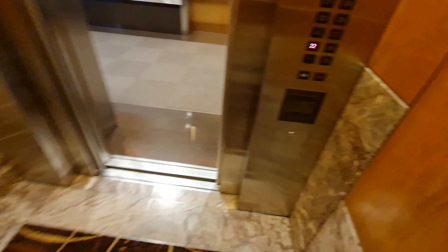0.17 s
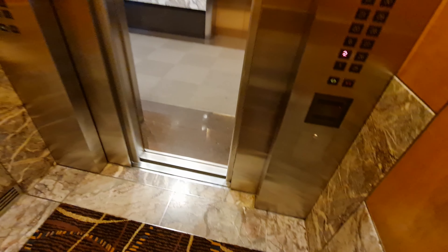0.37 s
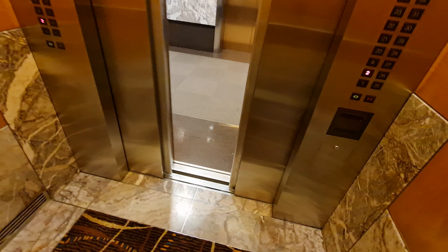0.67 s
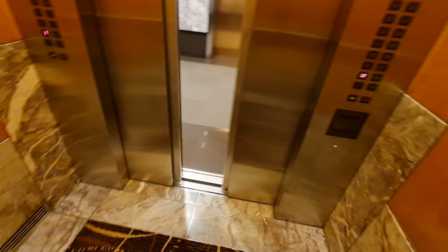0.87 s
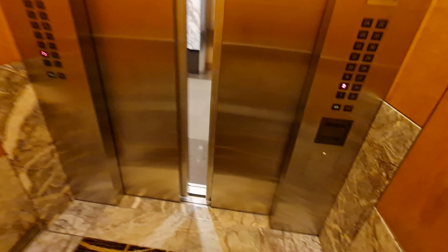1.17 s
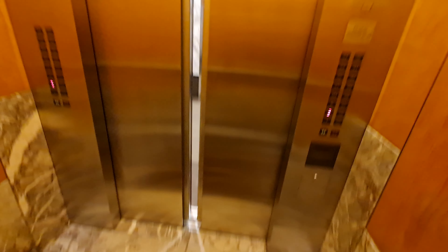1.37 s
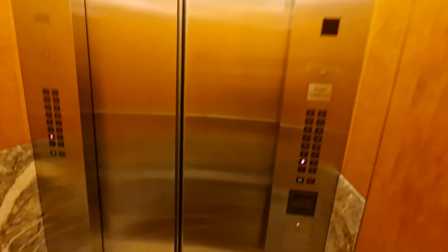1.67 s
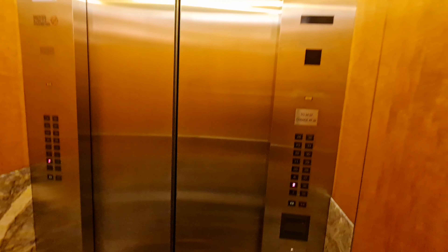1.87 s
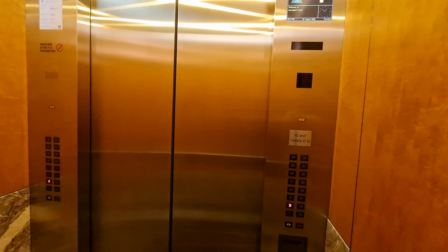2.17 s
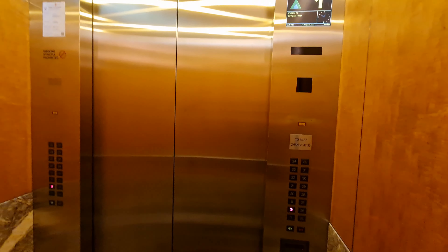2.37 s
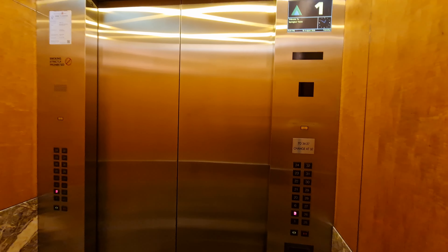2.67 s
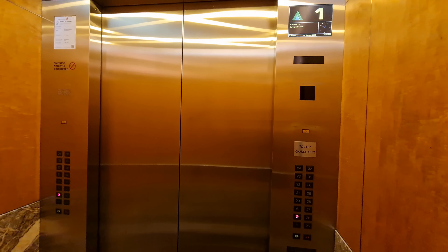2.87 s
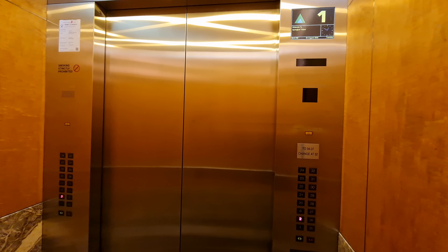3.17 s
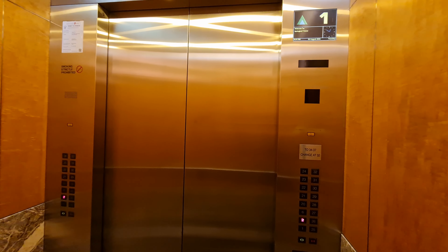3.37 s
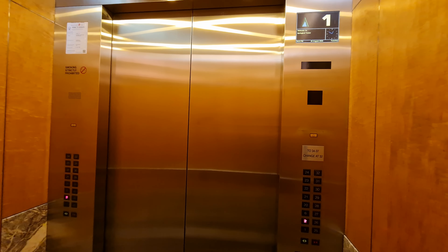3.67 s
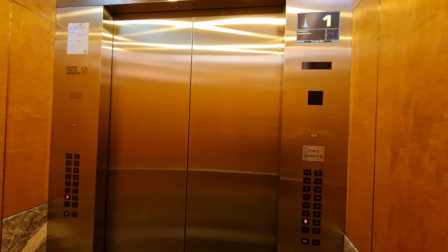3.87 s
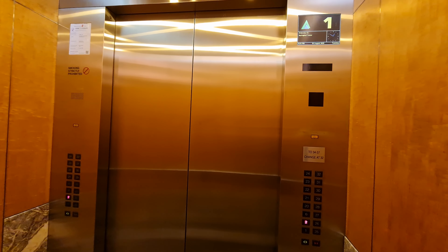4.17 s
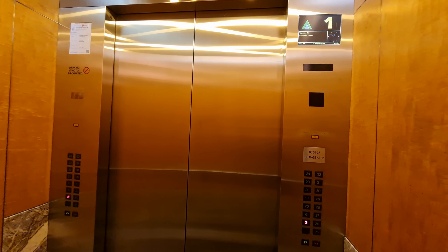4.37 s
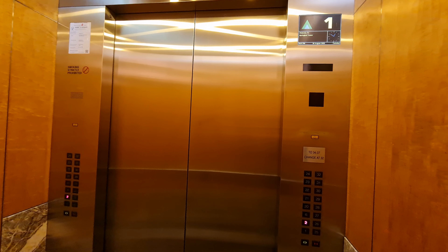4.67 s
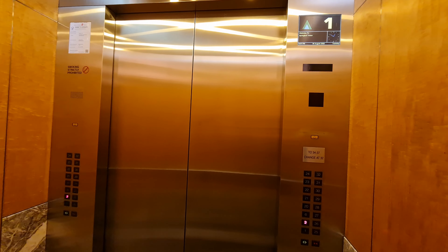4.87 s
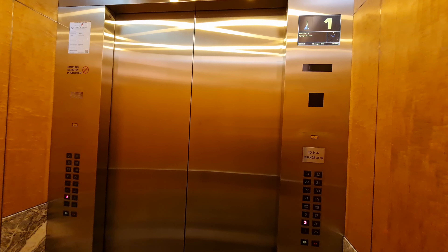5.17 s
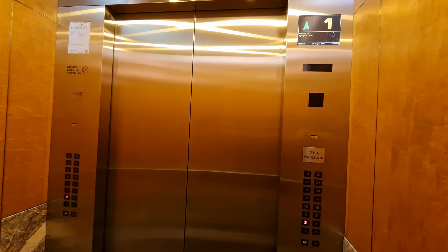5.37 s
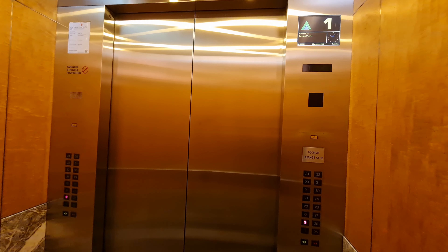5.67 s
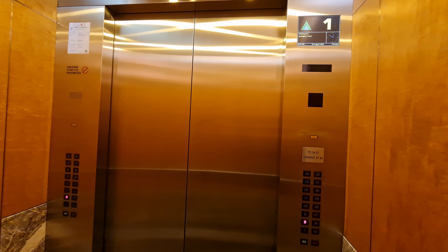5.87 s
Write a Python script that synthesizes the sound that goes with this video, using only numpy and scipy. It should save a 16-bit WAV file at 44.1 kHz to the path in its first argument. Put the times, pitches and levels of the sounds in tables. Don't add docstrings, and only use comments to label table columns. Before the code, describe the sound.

A closed lift car hums deeply at close range while rollers sing faintly, cloth rubs, a click snaps, and the floor shudders gently.

```python
import sys
import numpy as np
from scipy import signal
from scipy.fft import rfft, irfft, next_fast_len
from scipy.io import wavfile
from scipy.ndimage import uniform_filter1d, map_coordinates

SR = 44100
rng = np.random.default_rng(int(sys.argv[2]) if len(sys.argv) > 2 else 0)


def int16_out(signal):
    q = np.round(np.clip(np.atleast_2d(signal).T, -1, 1) * 32767)
    wavfile.write(sys.argv[1], SR, q.astype(np.int16))


def nominal_scale(level):
    x = np.asarray(level, float) / 20
    return 10 ** x


N = 264952


def unit(x):
    return x / np.sqrt(np.mean(x ** 2) + 1e-20)


def along(points, hz):
    point_hz, value = np.transpose(points)
    return np.interp(np.log(hz + 1), np.log(point_hz + 1), value)


def curves(rows):
    s, *columns = np.transpose(rows)
    return [np.interp(np.arange(N) / SR, s, column) for column in columns]


def wobble(rate, part=slice(None)):
    knots = rng.standard_normal(int(N * 60 / SR) + 4)
    return map_coordinates(knots, [np.arange(N)[part] * min(rate, 60) / SR])


def sides(db):
    return nominal_scale(np.array([db / 2, -db / 2]))


def filtered(x, response):
    size = next_fast_len(N + 8192)
    return irfft(rfft(x, size) * response(np.fft.rfftfreq(size, 1 / SR)), size)[..., :N]


def rush(gain, patchy_db, lean=0):
    # pitch_hz, likeness [-1 to 1]
    coherence = [(60, 0.83), (110, 1), (200, 0.73), (380, 0.13), (700, -0.25), (1290, -0.49),
                 (2380, -0.073), (4400, -0.06), (8120, -0.17), (15000, 0.06)]
    # pitch_hz, level_db
    balance = [(60, -4), (110, -11.5), (200, -3.5), (380, 1), (700, -1), (1290, 0), (2380, 1.5),
               (4400, -4.5), (8120, -7.5), (15000, -5)]
    z = signal.stft(rng.standard_normal((2, N + 512)), nperseg=512)[2]
    field = uniform_filter1d(rng.standard_normal(z.shape[1:]), size=6, axis=0)
    field = uniform_filter1d(field, size=12, axis=1)
    pair = signal.istft(z * nominal_scale(patchy_db * unit(field)), nperseg=512)[1][:, :N]

    def mid_side_gain(hz):
        angle = np.arccos(np.clip(along(coherence, hz), -1, 1)) / 2
        return gain(hz) * np.array([np.cos(angle), np.sin(angle)])

    mid, side = filtered(pair, mid_side_gain)
    both = np.array([mid + side, mid - side])
    both = filtered(both, lambda hz: sides(lean * along(balance, hz)))
    return both / np.std(both.mean(axis=0))


def shaped(points):
    return lambda hz: nominal_scale(along(points, hz)) * (hz > points[0][0]) * (hz < points[-1][0] * 1.2)


def peak(centre_hz, width_hz):
    return lambda hz: 1 / np.abs(1 + 2j * (hz - centre_hz) / width_hz)


def swells(times, halves, gains, rise=1):
    late = np.arange(N) / SR - np.asarray(times)[:, None]
    spread = np.where(late < 0, rise, 1) * np.reshape(halves, (-1, 1))
    return np.asarray(gains) ** 2 @ np.exp(-2 * (late / spread) ** 2)


def fan():
    # pitch_hz, level_db [per Hz]
    air_spectrum = [(12, -56.5), (25, -33.5), (72, -29), (100, -28), (140, -27.5), (280, -37.5), (630, -41),
                    (960, -51), (1720, -55), (2000, -60.5), (3660, -68.5), (6040, -71.5), (8700, -92),
                    (9200, -100)]
    # pitch_hz, level_db [per Hz]
    hiss_spectrum = [(5000, -16.5), (8600, -1), (9300, -2.5), (10500, -3.5), (12000, -1.5), (15800, -6.5)]
    # start_s, level_db
    flow = [(0, 1.5), (1.5, 2), (3, 2), (4.5, 0.5), (6.01, 0.5)]
    flow_db, = curves(flow)
    air = nominal_scale(-40.5 + flow_db + 0.19 * wobble(8.7)) * rush(shaped(air_spectrum), patchy_db=0.5, lean=1)
    return air + nominal_scale(-89.0) * rush(shaped(hiss_spectrum), patchy_db=.3, lean=1)


def hum():
    # start_s, level_db, left_right_db
    standing_wave = [(0.0, -24, -2.5), (0.37, -23, -3), (1.0, -27, -6.5), (1.32, -23.5, -6),
                     (1.5, -24.5, -5.0), (1.91, -21, -3), (2.39, -20, -2.5), (3.16, -20, -3.0),
                     (3.8, -22.5, -3.5), (4.05, -21.5, -3.5), (5.76, -22.5, -4.0), (6.01, -22.5, -4.0)]
    pitch_hz, start_rad, left_lead_rad = 100.11, .9, .22
    level_db, pan_db = curves(standing_wave)
    phase = 2 * np.pi * pitch_hz * np.arange(N) / SR + start_rad
    lead = np.array([[.5], [-.5]]) * left_lead_rad
    return np.sqrt(2) * nominal_scale(level_db) * sides(pan_db) * np.cos(phase + lead)


def hoist():
    # pitch_hz, level_db
    whine = [(5852, -91), (5954, -85.5), (6051, -83.5), (6153, -89), (6352, -98.5), (6455, -94.5)]
    # pitch_hz, width_hz, level_db
    modes = [(200, 17, -56), (211.5, 6.1, -54), (433, 9.3, -52), (545, 5.4, -59.5), (700, 9.7, -65.5),
             (1734, 150, -61.5)]
    # start_s, panel_drive_db, whine_db
    drive = [(0, -4, -8), (1.5, 0.5, -10), (2.5, 1.5, 0.5), (3.3, 0.5, -4.5), (3.8, 0, -1), (4.4, 4, 3.5),
             (5, 2, -9), (6.01, 4, -2.5)]
    drive_db, whine_db = curves(drive)

    def body(hz):
        return np.sqrt(sum((nominal_scale(db) * peak(c, w)(hz)) ** 2 / w for c, w, db in modes))

    panels = nominal_scale(drive_db - 54.5) * rush(body, patchy_db=.3, lean=1)
    t = np.arange(N) / SR
    comb = 0
    for hz, db in whine:
        comb = comb + nominal_scale(db + 3 * wobble(3)) * np.sin(2 * np.pi * (hz * t + rng.random()))
    return panels + nominal_scale(whine_db + 1.5) * comb * sides(-13.5)[:, None]


def singing():
    # centre_s, half_length_s, pitch_hz, level_db
    tones = [(0.34, 0.085, 290, -46.5), (.45, 0.064, 330, -52), (0.718, 0.084, 430, -43.5),
             (.95, 0.21, 235, -45.5), (0.5, 0.16, 525, -48), (1.56, 0.14, 310, -45.5),
             (2.0, 0.3, 630, -56.5), (1.2, 0.2, 230, -56), (4.4, 0.6, 335, -50.5), (4.28, 0.12, 801, -56.5),
             (4.58, 0.1, 801, -51.5), (5.18, 0.17, 801, -52.5), (4.45, 0.097, 640, -47.5),
             (4.75, 0.16, 640, -55.5), (4.2, 0.2, 640, -55), (7.7, 0.17, 840, -61.5),
             (6.1, 0.16, 440, -60.5), (4.5, .3, 425, -57.5)]
    out = np.zeros((2, N))
    right_lag_rad = np.array([[0], [1.3]])
    for s, half, hz, db in tones:
        part = slice(max(round((s - 2 * half) * SR), 0), round((s + 2 * half) * SR))
        t = np.arange(N)[part] / SR
        swell = nominal_scale(db + 2 + 2.6 * wobble(12, part)) * np.exp(-((t - s) / half) ** 4)
        out[:, part] += swell * np.sin(2 * np.pi * hz * t + 1.6 * wobble(14, part) - right_lag_rad)
    return out


def squeaks():
    # centre_s, half_length_s, pitch_hz, width_hz, level_db
    rubs = [
        (1.0, 0.15, 2900, 300, -57),
        (1.393, 0.031, 1100, 300, -49.5),
        (1.657, .05, 1820, 110, -60),
        (2.199, 0.042, 1400, 800, -58),
        (2.583, 0.014, 700, 500, -49.5),
        (4.15, 0.049, 2500, 500, -61.5),
        (4.57, 0.033, 8100, 150, -90),
        (5.46, .06, 9700, 251, -78.5),
        (5.79, .03, 8150, 150, -88),
    ]
    n = SR // 2
    out = np.zeros((2, N + SR))
    t, hz = (np.arange(n) - n // 2) / SR, np.fft.rfftfreq(n, 1 / SR)
    for s, half, c, w, db in rubs:
        noise = rng.standard_normal((2, n))
        rub = unit(irfft(rfft(noise) * peak(c, w)(hz) ** 2, n))
        out[:, round(s * SR) - n // 2:][:, :n] += nominal_scale(db) * np.exp(-(t / half) ** 4) * rub
    return out[:, :N]


def cloth():
    # pitch_hz, level_db [per Hz]
    scuff_spectrum = [(600, -29.5), (1000, -1), (1700, -0.5), (2900, -2), (4500, -22)]
    swish_spectrum = [(2200, -21.5), (3500, -1), (6000, -2.5), (8700, -12.5), (9200, -28)]
    fizz_spectrum = [(6000, -22), (8700, 0.5), (9500, -1), (12000, -1.5), (15800, -7.5)]
    # start_s, level_db
    fidget = [(0, 1.5), (.8, 0), (.97, 0), (1.5, -1), (1.75, -5), (2.2, -3), (2.75, -10.5), (4.4, -12.5),
              (4.6, -17), (6.01, -18)]
    # level_db [full movement], growth [dB per dB of movement], flutter_db
    weave = [
        (-58.5, 1.12, 1.75),
        (-60.5, 0.94, 0.77),
        (-72.5, 2.1, -0.1),
    ]
    # start_s, coarse_left_right_db, fine_left_right_db
    facing = [(0, -3.5, -4), (.78, -2, -5.5), (.89, 1, -1.5), (1.0, 1.5, -5.5), (2.1, -1, -8),
              (6.01, -3, -5)]
    # centre_s, length_s, swish_db, scuff_over_swish_db, fizz_over_swish_db
    stroke_rows = [(.06, 0.05, -57, 3, -7), (0.54, 0.14, -64.5, -4, -1.5), (0.693, .06, -68, -7, -0.5),
                   (0.868, 0.071, -58.5, 2, -12), (1.024, 0.037, -60, -3, -18.5),
                   (1.24, .07, -57.5, 4.5, -12), (1.386, .08, -58.5, 3.5, -19.5),
                   (1.955, 0.11, -66, -7, -13.5), (2.059, .04, -62, 3, -15), (2.17, .06, -59, 7, -16),
                   (2.373, .05, -66.5, 7.5, -21), (2.466, .06, -60.5, -7, -18.5),
                   (3.205, .15, -73.5, 3, -14.5), (3.381, 0.093, -69, 4.5, -20.5)]
    move_db, = curves(fidget)
    low_db, high_db = curves(facing)
    s, length, db, coarse_db, fine_db = np.transpose(stroke_rows)
    strokes = swells(s, length, nominal_scale([db + coarse_db, db, db + fine_db]), rise=.4)
    flutter = wobble(40)
    gains = []
    for (full_db, growth, depth_db), extra in zip(weave, strokes):
        bed = nominal_scale(full_db + growth * move_db)
        gains.append(np.sqrt(bed ** 2 + extra) * nominal_scale(depth_db * flutter))
    scuff = gains[0] * rush(shaped(scuff_spectrum), patchy_db=2.0)
    swish = gains[1] * rush(shaped(swish_spectrum), patchy_db=0.8)
    fizz = gains[2] * rush(shaped(fizz_spectrum), patchy_db=.3)
    return scuff * sides(low_db) + swish * sides(.5 * (low_db + high_db) - 1.5) + fizz * sides(high_db)


def grip():
    # start_s, peak_db, pitch_hz
    creaks = [(1.0288, -46, 13500), (1.0293, -46, 8000), (1.0375, -44, 13000), (1.0378, -41, 5000),
              (1.0455, -44, 6500), (1.0483, -49, 13000), (1.0913, -38, 13500), (1.387, -49, 13000),
              (1.4246, -37, 6500), (1.425, -37, 7000), (1.4248, -41, 12500), (1.7694, -46, 3500)]
    # start_s, peak_db
    snap_s, snap_db = (1.09118, -13.5)
    # pitch_hz, level_db, t60_s
    casing = [(560, -4, 0.0064), (1530, -11, 0.0047), (3180, -12, .002)]
    out, t = np.zeros(N), np.arange(-40, 400) / SR
    after = np.maximum(t, 0)
    rebound = sum(nominal_scale(db - 60 * after / t60) * np.sin(2 * np.pi * hz * after) for hz, db, t60 in casing)
    push = np.exp(-np.abs(t / 7e-5) ** 1.4)
    out[round(snap_s * SR) - 40:][:len(t)] += nominal_scale(snap_db) * (push - rebound)
    for s, db, hz in creaks:
        creak = np.exp(-(t / 1.6e-4) ** 2) * np.cos(2 * np.pi * hz * t)
        out[round(s * SR) - 40:][:len(t)] += nominal_scale(db) * creak
    return np.array([-nominal_scale(-16.0) * np.roll(out, 3), out])


def doors():
    # start_s, level_db
    speed = [
        (0, 0),
        (.6, 0),
        (1.2, -3.5),
        (1.5, -2),
        (1.9, -4.5),
        (2.6, -6.5),
        (4.6, -7),
        (5, -2.5),
        (6.01, -4.5),
    ]
    # pitch_hz, level_db [per Hz]
    roll_spectrum = [(150, -29.5), (250, 0.5), (420, 1.5), (700, -6), (1200, -16), (2500, -28)]
    shake_spectrum = [(12, -27.5), (25, -1.5), (55, -1), (80, -5.5), (160, -28.5)]
    # centre_s, level_db
    jolts = [(.33, -41), (1.0, -44), (1.75, -43.5), (2.1, -47.5), (3.13, -51), (3.83, -44.5), (4.38, -43),
             (4.9, -45.5), (5.3, -41.5), (5.55, -44.5), (5.9, -42)]
    roll_db, resting_shake_db, jolt_half_s = -44.5, -53, .12
    speed_db, = curves(speed)
    s, db = np.transpose(jolts)
    shake = np.sqrt(nominal_scale(resting_shake_db) ** 2 + swells(s, jolt_half_s, nominal_scale(db)))
    shudder = shake * nominal_scale(.8 * wobble(8.5)) * rush(shaped(shake_spectrum), patchy_db=1.0, lean=1.0)
    return shudder + nominal_scale(roll_db + speed_db) * rush(shaped(roll_spectrum), patchy_db=2, lean=0.86)


def scene():
    return fan() + hum() + hoist() + singing() + squeaks() + cloth() + grip() + doors()


def mute_faint(x):
    # pitch_hz, readiness [standard deviations]
    dropout = [(5000, -3.2), (7500, -2.3), (8800, -1.7), (9250, .35), (10300, -.1), (11500, -1.4),
               (15800, -2.4)]
    padded = np.pad(x, ((0, 0), (0, 2048)), "reflect", reflect_type="odd")
    hz, _, z = signal.stft(padded, SR, nperseg=1024, boundary="odd")
    treble = np.median(np.abs(z[:, 200:280]) ** 2, axis=1, keepdims=True)
    treble_db = 10 * np.log10(treble + 1e-20)
    above_db = treble_db - treble_db.min(axis=2, keepdims=True) - 3
    cells = rng.standard_normal((2, len(hz) // 4 + 1, z.shape[2] // 2 + 1))
    cells = uniform_filter1d(cells, size=3, axis=2)
    luck = unit(cells.repeat(4, axis=1).repeat(2, axis=2)[:, :len(hz), :z.shape[2]])
    port = np.array([-.4, 0])[:, None, None]
    ready = along(dropout, hz)[:, None] - .065 * above_db + port
    muted = (luck < ready) & (hz[:, None] > 4000)
    return signal.istft(z * np.where(muted, .04, 1), SR, nperseg=1024)[1][:, :N]


def band_limit(x):
    return signal.sosfilt(signal.butter(12, 15710, fs=SR, output="sos"), x)


def record(dry):
    mix = mute_faint(dry)
    return band_limit(mix)


dry = scene()
out = record(dry)
int16_out(out)
```